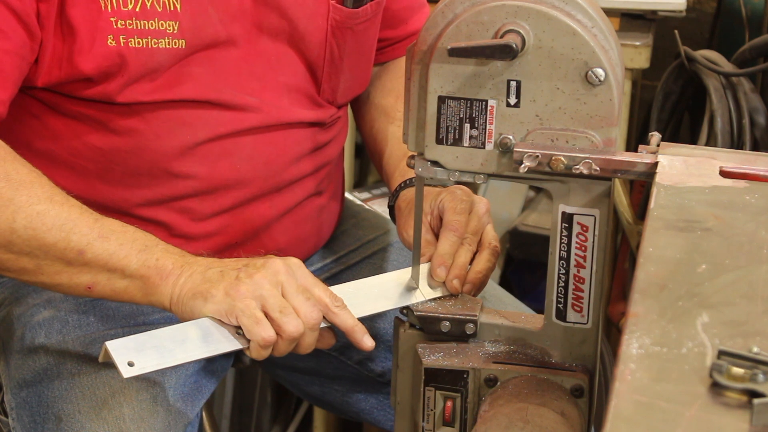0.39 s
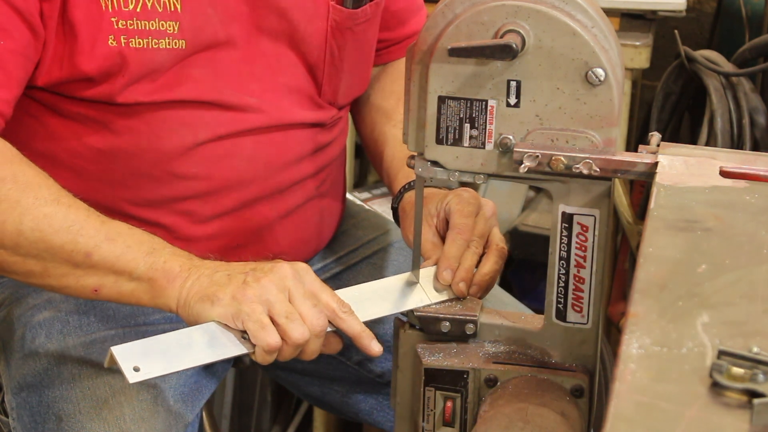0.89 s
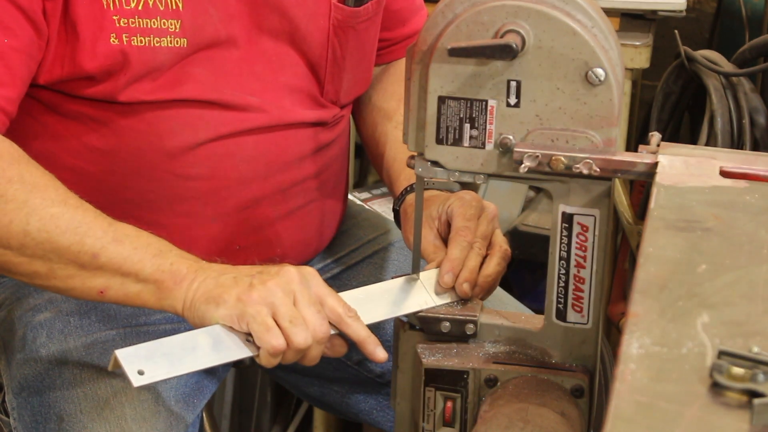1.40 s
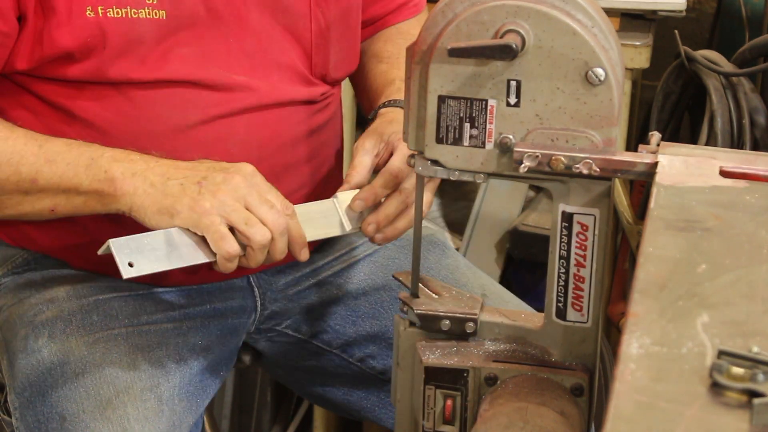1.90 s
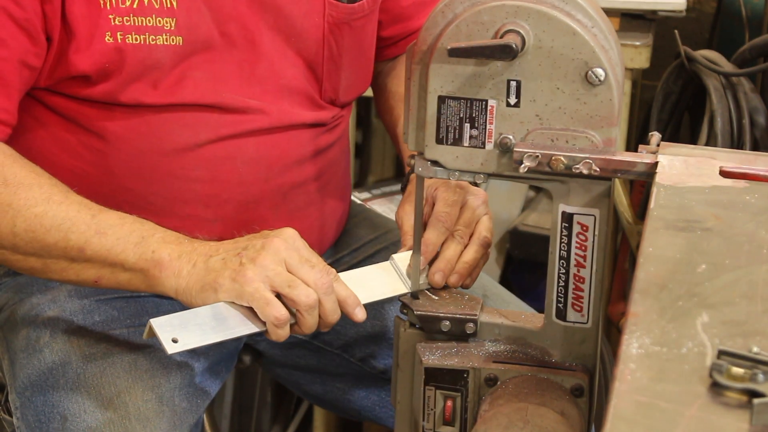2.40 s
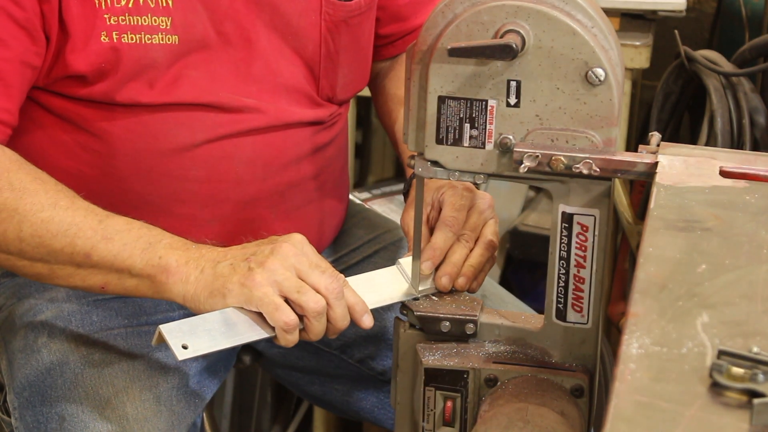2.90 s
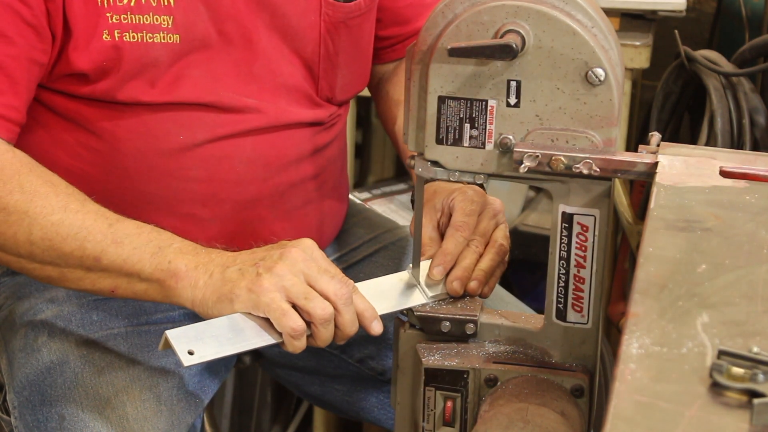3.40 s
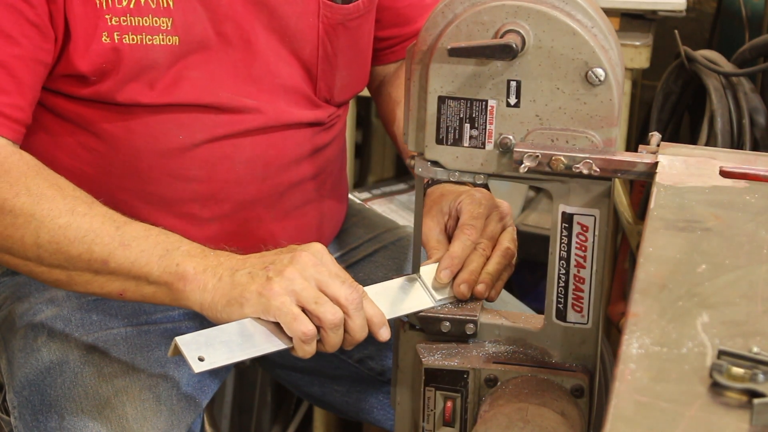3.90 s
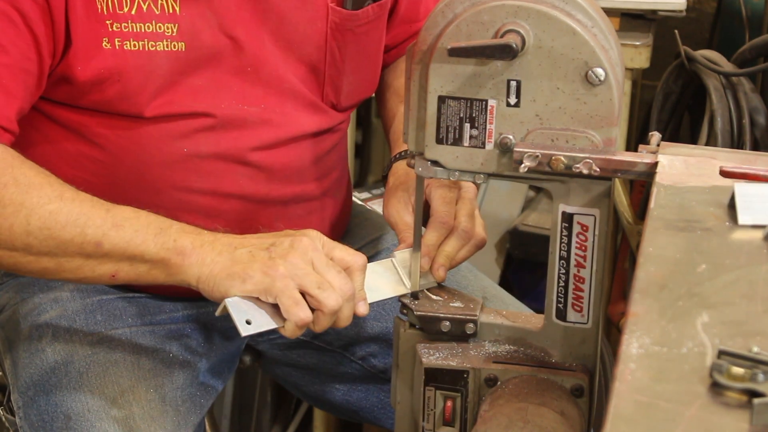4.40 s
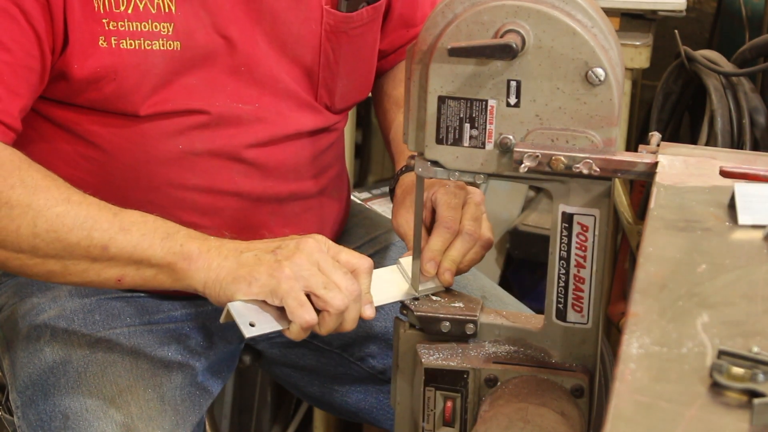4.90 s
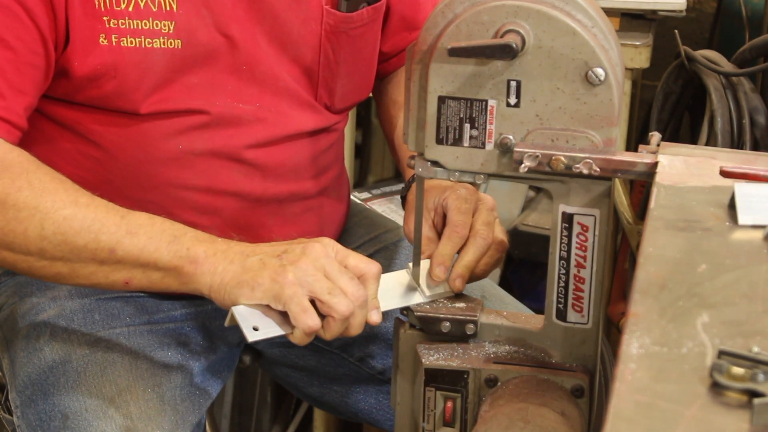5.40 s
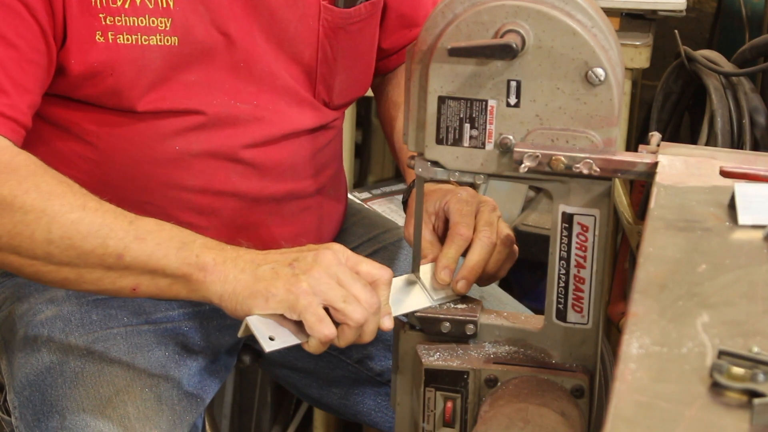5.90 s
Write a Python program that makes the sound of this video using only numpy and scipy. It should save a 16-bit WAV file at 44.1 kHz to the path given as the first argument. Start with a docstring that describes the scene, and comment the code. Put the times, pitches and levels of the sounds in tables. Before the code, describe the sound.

A portable band saw cuts a light metal angle very close to one overloaded microphone. Broad housing roar and bright, hissing tooth rasp run continuously, while a piercing high motor whine surges in short irregular swells. Just before two seconds everything but the swells jumps louder, with quick choppy dips; after four seconds it drops back. Brief thin squeals come near the end. Dry, centred, with no audible room.

```python
"""A portable band saw on a stand cuts a light metal angle, straight ahead of one close, overloaded microphone.
From the start the housing roars, the teeth rasp and the motor's slot whine comes in swells; both are noise
shaped by body resonances and tones locked to the shaft, with a throbbing whistle and faint shaft orders.
From 1.89 to 4.27 s everything but the swells is turned up, with short cross-faded parts inside; then it is
quieter again. Near the end come four brief squeals."""
import sys
import numpy as np
from scipy import signal
from scipy.fft import rfft, irfft, next_fast_len
from scipy.io import wavfile
from scipy.ndimage import uniform_filter1d, map_coordinates

SR = 44100
rng = np.random.default_rng(int(sys.argv[2]) if len(sys.argv) > 2 else 0)


def linear_from_db(decibels):
    """Turn decibels (scalar or array-like) into linear amplitude factors; 0 gives 1."""
    return 10 ** (np.asarray(decibels, float) / 20)


def put_to_file(sound):
    """Save the sound as 16-bit audio at rate SR, in the file named by the first command-line argument."""
    columns = np.atleast_2d(sound).T  # one column per channel
    safe = np.clip(columns, -1, 1)
    whole_steps = np.round(safe * 32767)
    wavfile.write(sys.argv[1], SR, whole_steps.astype(np.int16))


N = 264908
FIRST_JOIN_S, JOIN_EVERY_S, JOINS = 2.0245, .17335, 13  # cross-faded joins in the loud stretch
ROAR_DB = -50  # rms at the quiet level, before its loudness curve and wobble are added


def along(points, hz):
    """Reads (f/Hz, value) points on a log frequency axis."""
    f, value = np.transpose(points)
    return np.interp(np.log(hz + 1), np.log(f + 1), value)


def curves(rows):
    """Draws one value per sample for each column after the time."""
    s, *columns = np.transpose(rows)
    return [np.interp(np.arange(N) / SR, s, column) for column in columns]


def wobble(rate):
    """A smooth random curve with rate knots a second."""
    knots = rng.standard_normal(int(N * rate / SR) + 4)
    return map_coordinates(knots, [np.arange(N) * rate / SR])


def swell(start, length):
    """A soft-edged plateau from 0 to 1."""
    edge = 0.0067 + 0.057 * length  # a least time in s plus a share of the length
    t = np.arange(0, N, 32) / SR
    plateau = (np.tanh((t - start) / edge) - np.tanh((t - start - length) / edge)) / 2
    return np.interp(np.arange(N) / SR, t, plateau)


# overall level over its quiet level: [t/s, level/dB]
LOUDNESS_CURVE = [(0, 0.5), (1, -.7), (1.45, 0.65), (1.888, -0.3), (1.892, 8), (2.2, 9), (2.5, 7.5),
                  (3.1, 8.5), (3.2, 6.5), (3.4, 8), (3.5, 9), (3.9, 7.5), (4.266, 7.5), (4.27, 0),
                  (4.7, 0.5), (5.05, -0.2), (5.6, 0.6), (6.01, -1.3)]


def overall_loudness():
    """Overall level in dB over its quiet level, stepping up about 8 dB from 1.89 to 4.27 s."""
    loudness_db, = curves(LOUDNESS_CURVE)
    return loudness_db


# resonances of frame, blade and work piece: [f/Hz, width/Hz, level over surroundings/dB]
BODY_RESONANCES = [(380, 30, -1), (614, 59, 2), (751.6, 38, 7.5), (812, 59, 10.5), (995, 19, 5),
                   (1168, 130, 6.5), (1442, 48, 4), (1724, 43, 9), (1757, 120, -6.5), (1990, 110, 5),
                   (3056, 66, 6), (3320, 120, -0.5), (4270, 89, 4), (5370, 62, 0), (5700, 93, 2.5),
                   (6100, 70, 2.5), (6600, 150, 2)]


def rush(spectrum, patchy_db):
    """Noise of rms 1, patchy in time and pitch, ringing in the saw's resonances."""
    z = signal.stft(rng.standard_normal(N), nperseg=512)[2]
    patches = uniform_filter1d(rng.standard_normal(z.shape), size=6, axis=0)  # across pitch
    patches = uniform_filter1d(patches, size=10, axis=1)  # across time
    x = signal.istft(z * linear_from_db(patchy_db * patches / patches.std()), nperseg=512)[1][:N]
    m = next_fast_len(N + 8192)
    hz = np.fft.rfftfreq(m, 1 / SR)
    ringing_db = sum(db / (1 + (2 * (hz - centre) / width) ** 2) for centre, width, db in BODY_RESONANCES)
    x = irfft(rfft(x, m) * linear_from_db(along(spectrum, hz) + ringing_db), m)[:N]
    return x / x.std()


# colour of the housing's roar, only its shape counts: [f/Hz, level per Hz/dB]
ROAR_COLOUR = [(15, -47), (28, -26), (120, -26.5), (300, -26), (500, -20.5), (700, -12.5), (1200, -17),
               (2200, -16), (3300, -21.5), (4500, -29), (8000, -28.5), (16000, -61)]


def housing_roar(loudness_db):
    """The housing's broad noise, following the overall level dB for dB."""
    level = linear_from_db(ROAR_DB + loudness_db + 0.86 * wobble(8))
    return level * rush(ROAR_COLOUR, patchy_db=0.72)


# colour of the teeth's rasp, only its shape counts: [f/Hz, level per Hz/dB]
RASP_COLOUR = [(1500, -32.5), (3000, -14.5), (3800, -5), (4400, -2.5), (5200, -1.5), (6300, -3),
               (7000, -10.5), (8000, -16), (11000, -16.5), (13000, -20), (16000, -24)]


def teeth_rasp(loudness_db):
    """The teeth's bright noise, following the overall level by slightly more than dB for dB."""
    rasp_db, rasp_grows = -49.5, 1.08
    level = linear_from_db(rasp_db + rasp_grows * loudness_db + 0.63 * wobble(13))
    return level * rush(RASP_COLOUR, patchy_db=0.72)


# motor shaft, sagging under load and jumping at both ends of the loud stretch: [t/s, speed/turns per s]
SHAFT_SPEED = [(0, 385.3), (.95, 382.2), (1.36, 378.9), (1.8, 381.4), (1.888, 389), (1.892, 398.1),
               (2.368, 396.4), (2.392, 391.6), (2.8, 386), (3.19, 382.9), (3.44, 383.2), (3.7, 381.3),
               (4.1, 380.8), (4.266, 385.4), (4.27, 400.6), (4.38, 397), (4.545, 389.2), (4.8, 383.6),
               (5.58, 379.7), (5.75, 380.9), (5.8, 377.2), (6.01, 377.6)]


def shaft():
    """Shaft speed in turns per second and the angle in radians it sums to, which times every tone."""
    speed, = curves(SHAFT_SPEED)
    return speed, 2 * np.pi * np.cumsum(speed) / SR


# weak, wavering shaft orders: [multiple of the shaft rate, peak level over roar/dB, waver/dB]
SHAFT_ORDERS = [(1, -25, 2), (13, -27, 1.5), (15, -25, 1.5), (24, -24, 2)]


def faint_orders(turn, roar_db):
    """Sines at whole multiples of the shaft rate, wavering in level and phase."""
    total = 0
    for multiple, db, waver_db in SHAFT_ORDERS:
        level = linear_from_db(roar_db + db + waver_db * wobble(14))
        total = total + level * np.sin(multiple * turn + 1.37 * wobble(12))
    return total


# resonances that let the commutator whistle through: [f/Hz, width/Hz, peak level over roar before the throb/dB]
WHISTLE_RESONANCES = [(8375, 120, -15.5), (8740, 80, -19)]


def commutator_whistle(speed, turn, roar_db):
    """A throbbing tone at 22 commutator bars a turn, heard where it crosses the resonances."""
    bars = 22
    beat_hz, beat_peak_s, beat_depth = 8.99, 1.1, .8
    t = np.arange(N) / SR
    heard = sum(linear_from_db(db) / (1 + (2 * (bars * speed - hz) / width) ** 2)
                for hz, width, db in WHISTLE_RESONANCES)
    throb = 1 + beat_depth * np.cos(2 * np.pi * beat_hz * (t - beat_peak_s))
    level = linear_from_db(roar_db + 0.85 * wobble(14))
    return level * heard * throb * np.sin(bars * turn + .6 * wobble(16))


# swells of the slot whine, rms before its flutter: [start t/s, length/s, level/dB]
WHINE_SWELLS = [(.031, .2, -46), (.261, .089, -43), (.346, .064, -43.5), (.497, .027, -50),
                (.565, 0.25, -39.5), (.759, 0.22, -41), (1.002, 0.06, -44.5), (1.078, 0.12, -43),
                (1.161, .09, -43.5), (1.345, .03, -57), (1.406, 0.029, -45), (1.48, 0.027, -50),
                (1.615, 0.082, -44.5), (1.74, 0.096, -42.5), (1.851, 0.098, -45.5), (1.943, 0.094, -42.5),
                (2.045, 0.061, -42), (2.15, 0.095, -38), (2.241, .057, -36.5), (2.318, 0.085, -36.5),
                (2.413, 0.096, -41.5), (2.545, 0.14, -42), (2.605, .125, -38.5), (2.768, .048, -43.5),
                (2.836, 0.096, -53), (2.931, .024, -36), (2.978, .043, -50), (3.003, 0.12, -41.5),
                (3.105, 0.17, -35.5), (3.271, 0.22, -35), (3.524, 0.079, -37), (3.593, .12, -38.5),
                (3.67, .16, -40), (3.856, .056, -44.5), (3.93, 0.037, -42.5), (3.987, 0.09, -40),
                (4.085, .095, -46), (4.191, 0.03, -38), (4.227, 0.057, -44), (4.272, 0.048, -42),
                (4.37, .11, -46), (4.515, .017, -51), (4.546, 0.028, -51), (4.597, .065, -48),
                (4.693, .017, -49), (4.733, 0.053, -46), (4.81, 0.19, -40.5), (4.999, 0.13, -41),
                (5.18, .027, -46), (5.226, 0.21, -43), (5.43, .081, -45), (5.786, 0.042, -45),
                (5.841, 0.094, -41)]


def slot_whine(turn, roar_db):
    """The slots' tone, 12 times a turn, in swells over a flickering undertone, with a third harmonic."""
    step_rad = 2.13  # each swell starts this far out of step with the last, so they cancel where they meet
    undertone_db, flicker_db = -11, 3  # the whine between swells, over the roar
    overtone_db, overtone_from_db = -33, -41  # overtone peak against whine rms, at this whine level
    size = linear_from_db(roar_db + undertone_db + flicker_db * wobble(30))
    for k, (start, length, db) in enumerate(WHINE_SWELLS):
        size = size + linear_from_db(db) * swell(start, length) * np.exp(1j * k * step_rad)
    phase = 12 * turn + .22 * wobble(25) + .1 * wobble(200)
    flutter = linear_from_db(1.1 * wobble(25) + 0.69 * wobble(150))
    whine = np.sqrt(2) * flutter * np.imag(size * np.exp(1j * phase))
    overtone_size = linear_from_db(overtone_db - 2 * overtone_from_db) * np.abs(size) ** 3  # grows as the cube
    return whine + overtone_size * np.sin(3 * (phase + np.angle(size)))


# brief squeals: [start t/s, length/s, rms level/dB, multiple of the shaft rate]
SQUEALS = [(5.58, .12, -70, 8), (5.742, .052, -53, 8), (5.79, .04, -55, 16), (5.905, .085, -52, 16)]


def squeals(turn):
    """Short soft-edged sines locked to multiples of the shaft rate."""
    return sum(np.sqrt(2) * linear_from_db(db) * swell(start, length) * np.sin(multiple * turn)
               for start, length, db, multiple in SQUEALS)


def scene():
    """The saw as one source, straight ahead."""
    loudness_db = overall_loudness()
    roar_db = ROAR_DB + loudness_db
    noise = housing_roar(loudness_db) + teeth_rasp(loudness_db)
    speed, turn = shaft()
    tones = faint_orders(turn, roar_db) + commutator_whistle(speed, turn, roar_db)
    tones = tones + slot_whine(turn, roar_db) + squeals(turn)
    return np.tile(noise + tones, (2, 1))


def overload(x, top, hardness):
    """The microphone's input stage rounds off the peaks and adds an overtone at three times the whine."""
    return x / (1 + np.abs(x / top) ** hardness) ** (1 / hardness)


# the loud stretch: [start t/s, end t/s]
LOUD_STRETCH = (1.89, 4.268)
# phase drifts in each part: [start after the join t/s, drift length/s, snapped back after the join t/s]
PHASE_DRIFTS = [(.003, .033, .044), (.044, .046, .13)]


def loosened(x, outer_turn):
    """Turned phases (rad) keep the colour but let the flattened peaks stick out again."""
    drift_rad, snap_s = 1.1, .004
    t = np.arange(N) / SR
    loud = (t > LOUD_STRETCH[0]) & (t < LOUD_STRETCH[1])
    since = (t - FIRST_JOIN_S) % JOIN_EVERY_S
    drift = sum(np.clip((since - start) / rise, 0, 1) * np.clip((snap - since) / snap_s, 0, 1)
                for start, rise, snap in PHASE_DRIFTS)
    angle = np.where(loud, drift_rad * drift, outer_turn)
    return np.real(signal.hilbert(x, next_fast_len(N))[:N] * np.exp(1j * angle))


def joined(x, fade_s, count):
    """Cross-fades at each join to or from a copy count samples later, half a whine cycle: it cancels half-way."""
    joins = FIRST_JOIN_S + JOIN_EVERY_S * np.arange(JOINS)
    s = np.ravel(joins[:, None] + [-fade_s / 2, fade_s / 2])
    ends = (np.arange(1, 2 * JOINS + 1) // 2) % 2  # 0, 1, 1, 0, 0, 1 ...
    share = np.interp(np.arange(N) / SR, s, ends)
    return (1 - share) * x + share * np.roll(x, count)


def low_pass(x):
    """Removes everything above the highest recorded frequency."""
    return signal.sosfilt(signal.butter(12, 15710, fs=SR, output="sos"), x)


def record(dry):
    """One close, overloaded microphone on both channels, then turned phases and cross-fades."""
    mono = overload(dry[0], top=.0172, hardness=8)
    mono = loosened(mono, outer_turn=1.2)
    mono = joined(mono, fade_s=.0105, count=5)
    return low_pass(np.array([mono, mono]))


dry = scene()
out = record(dry)
put_to_file(out)
```